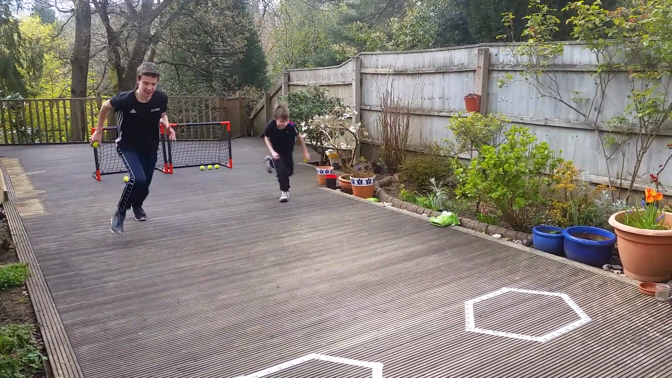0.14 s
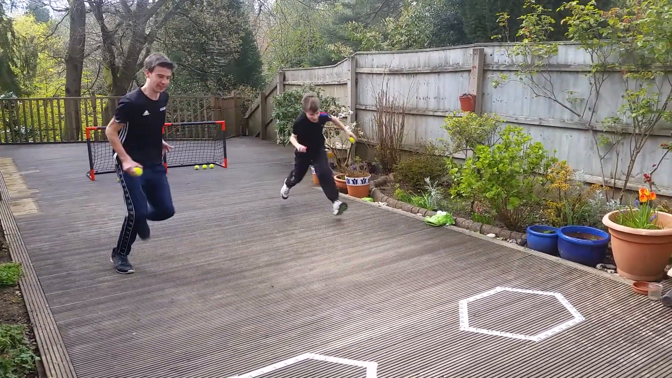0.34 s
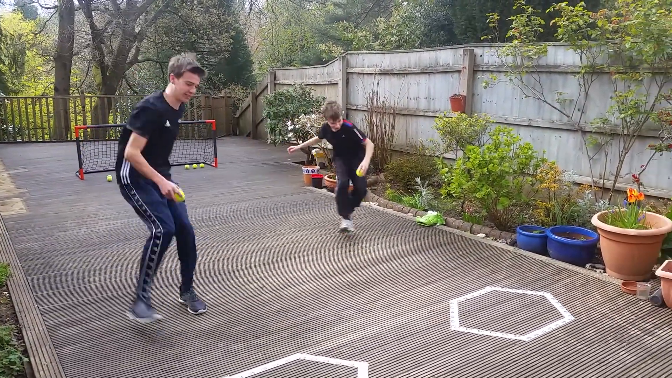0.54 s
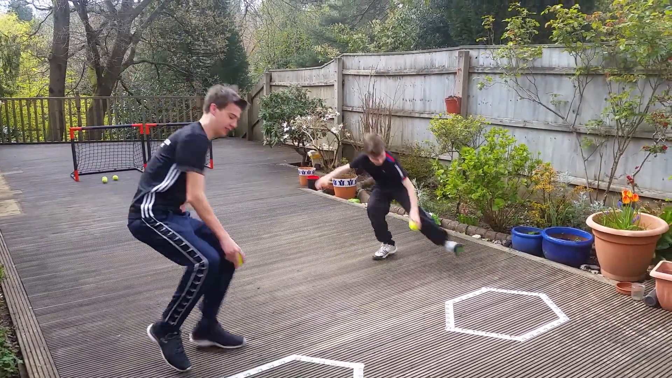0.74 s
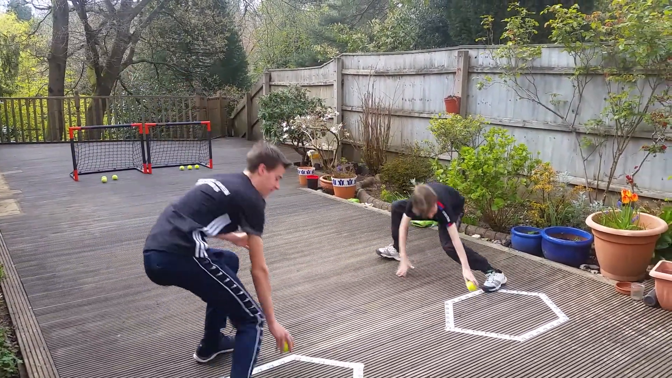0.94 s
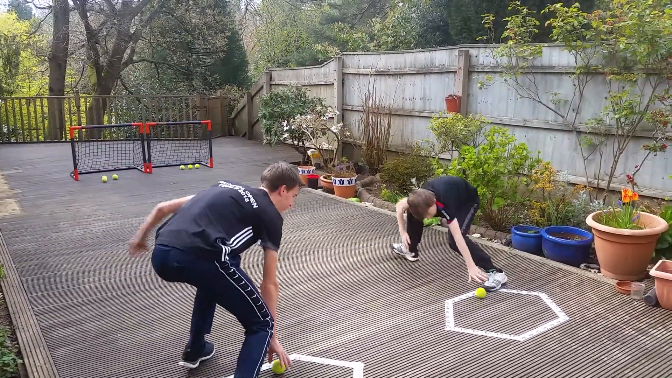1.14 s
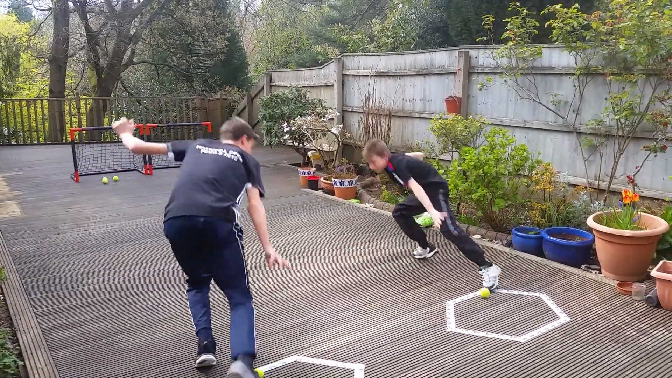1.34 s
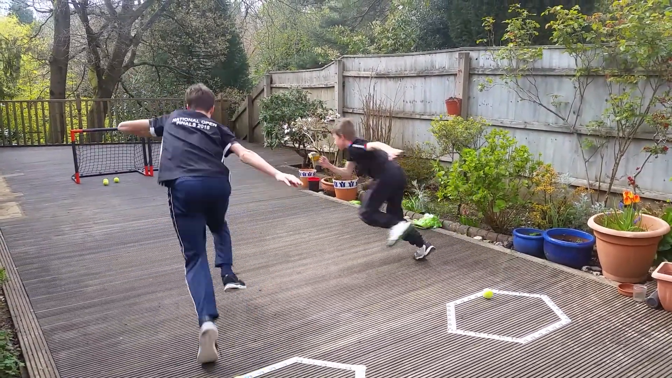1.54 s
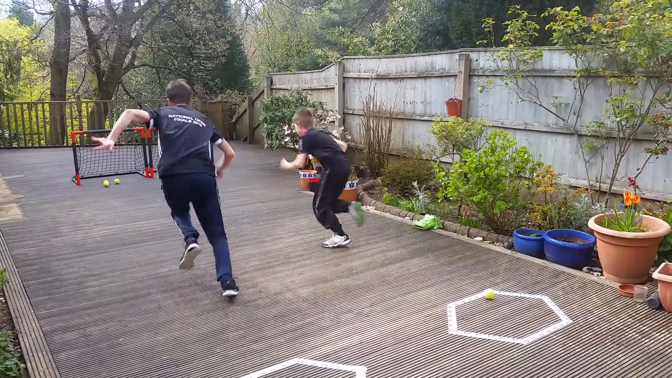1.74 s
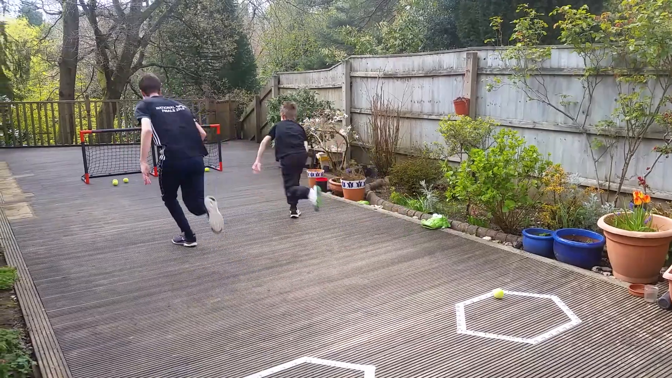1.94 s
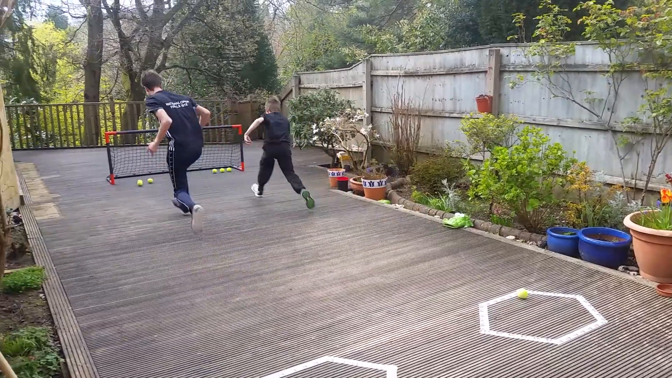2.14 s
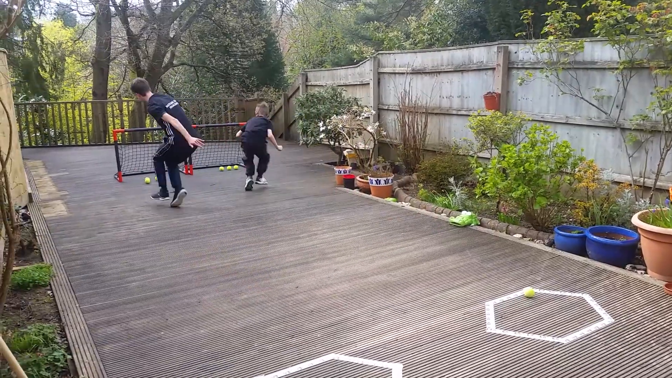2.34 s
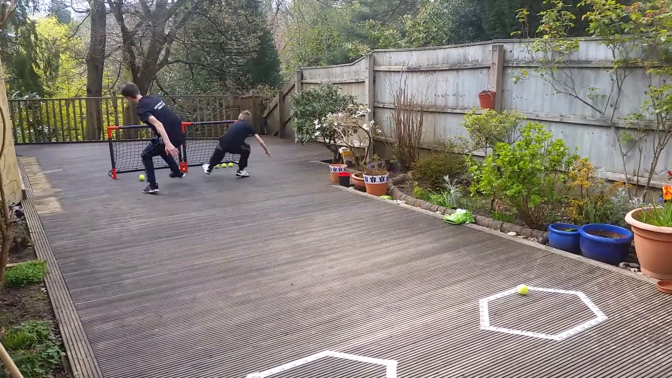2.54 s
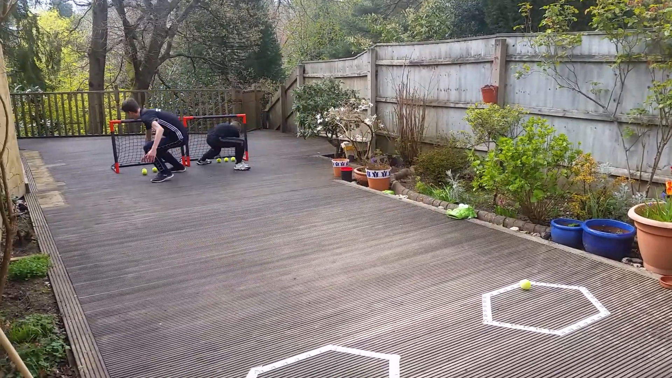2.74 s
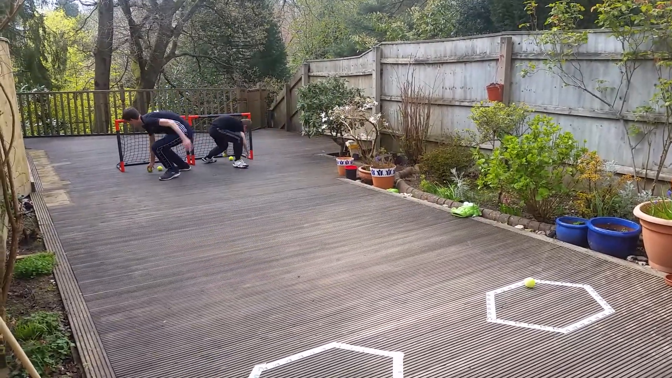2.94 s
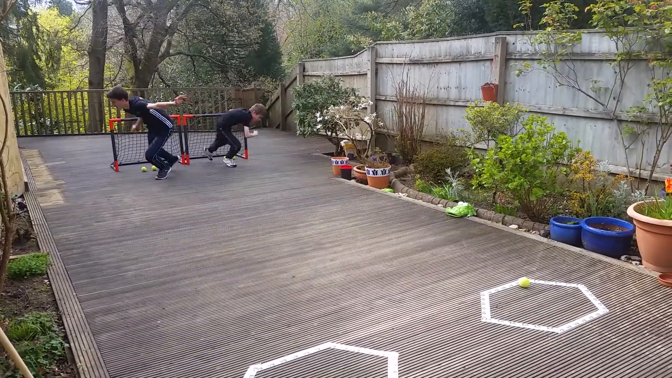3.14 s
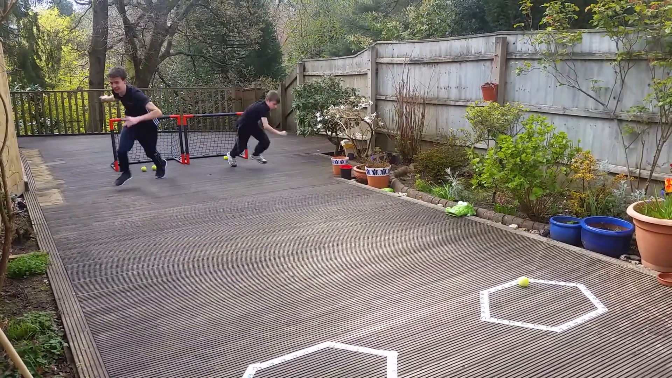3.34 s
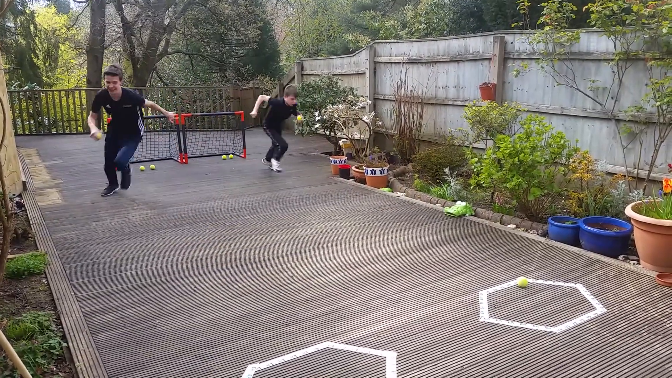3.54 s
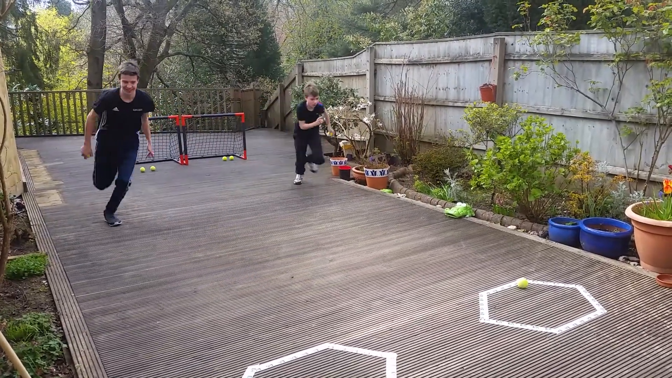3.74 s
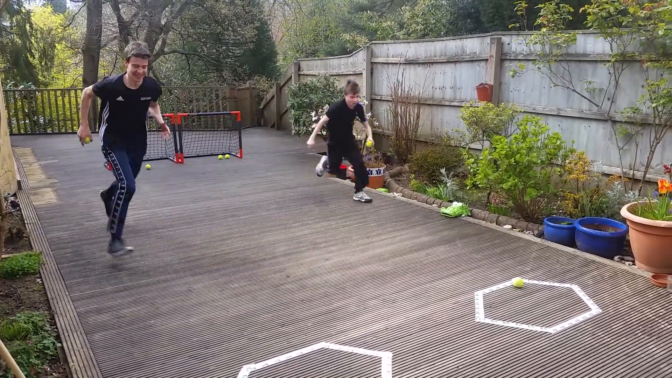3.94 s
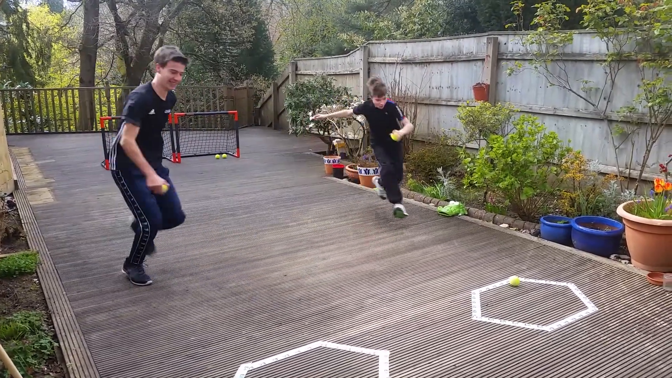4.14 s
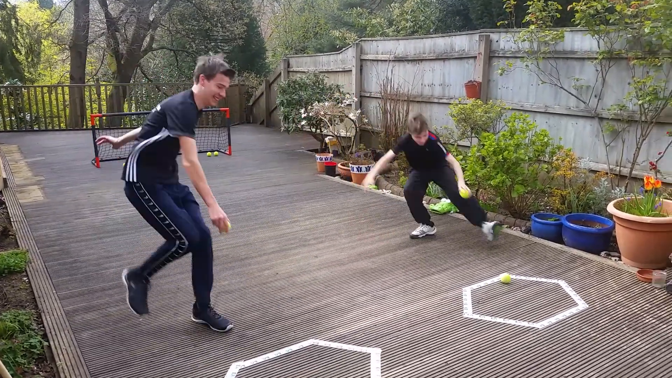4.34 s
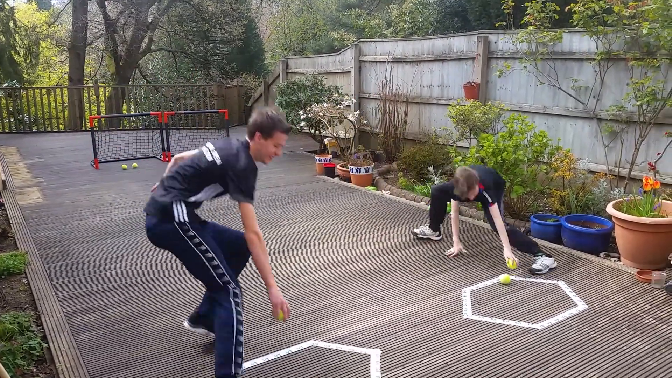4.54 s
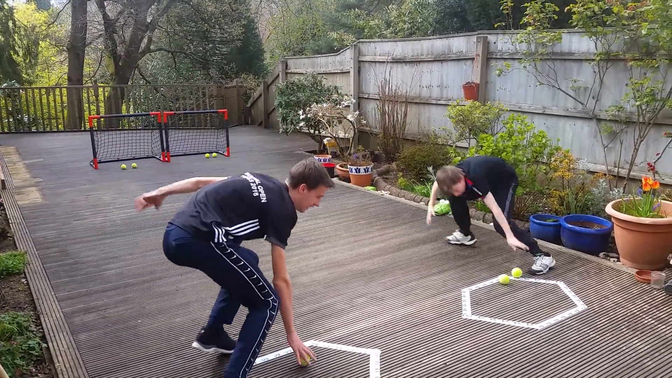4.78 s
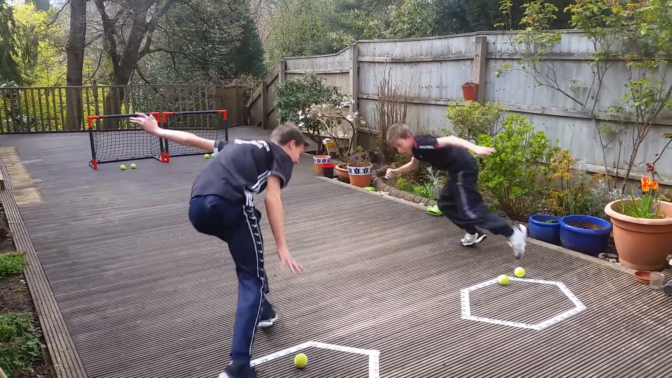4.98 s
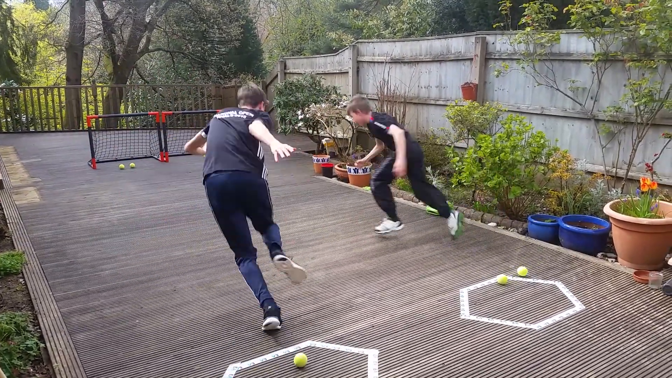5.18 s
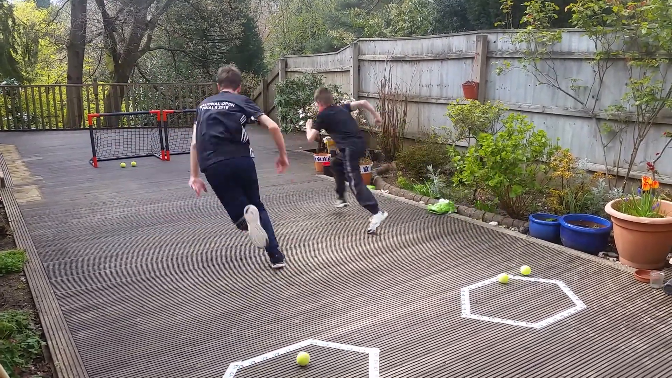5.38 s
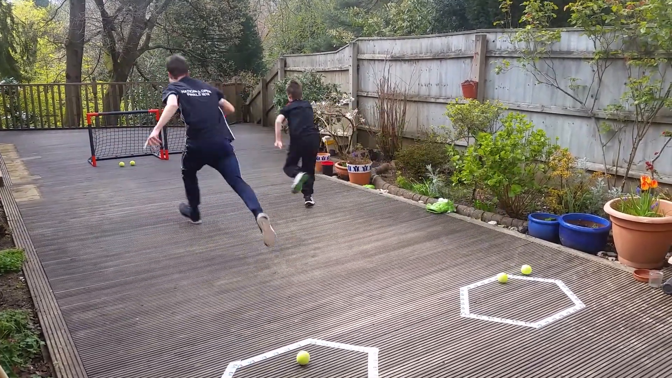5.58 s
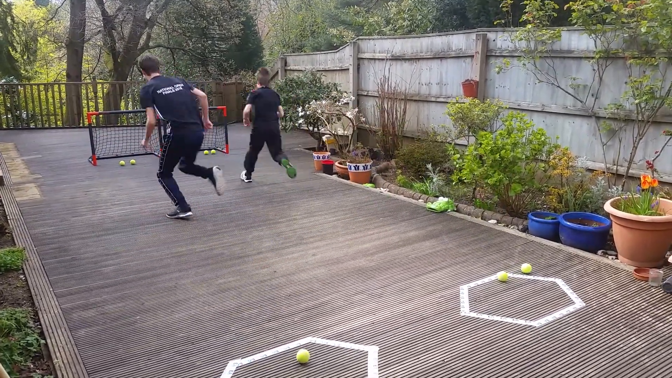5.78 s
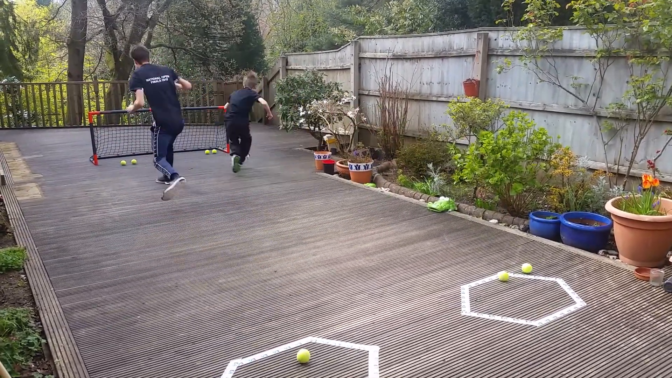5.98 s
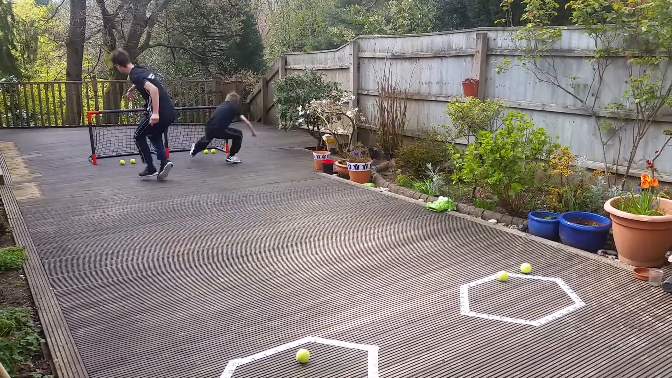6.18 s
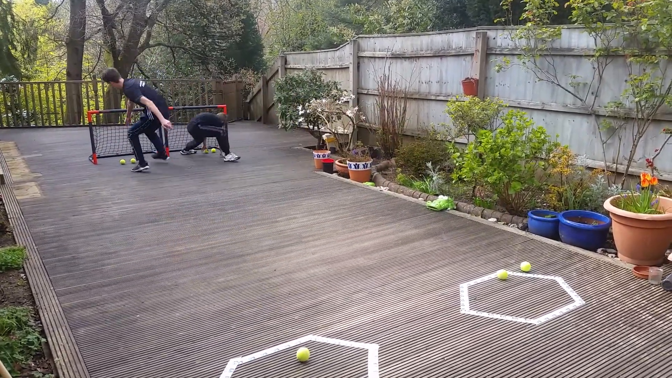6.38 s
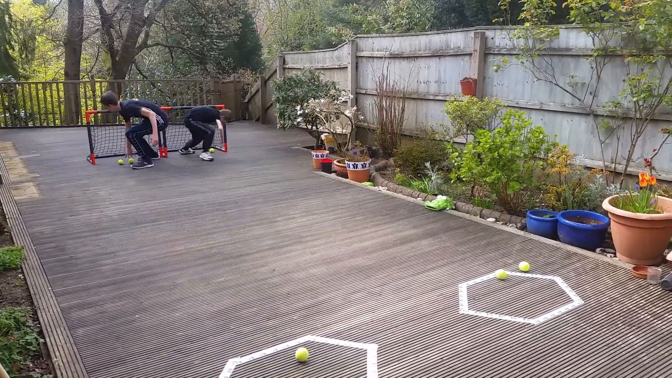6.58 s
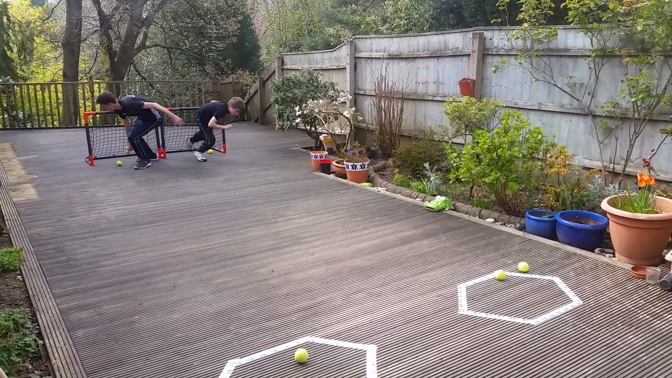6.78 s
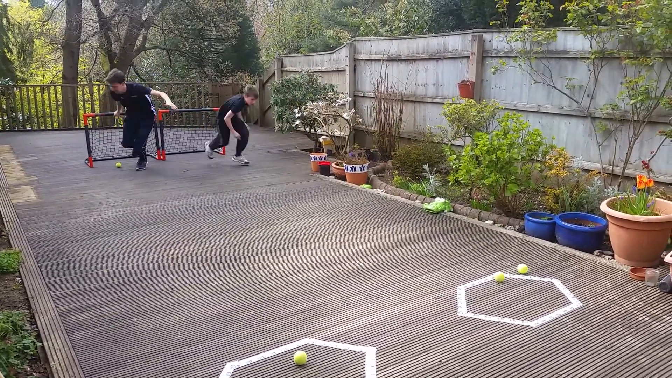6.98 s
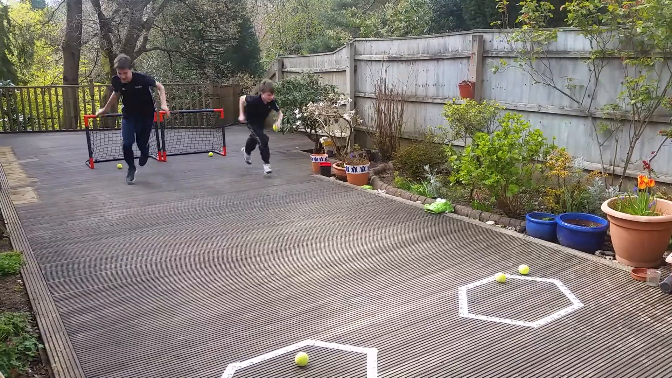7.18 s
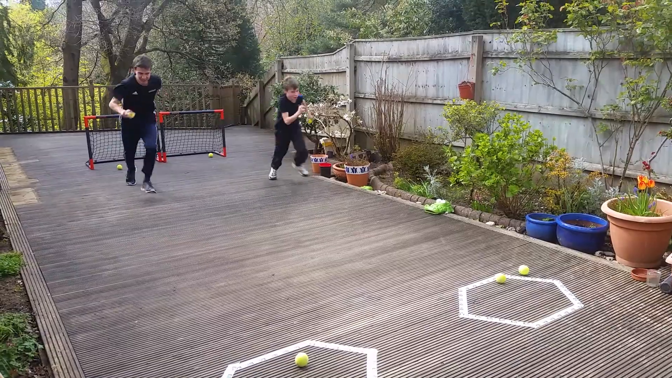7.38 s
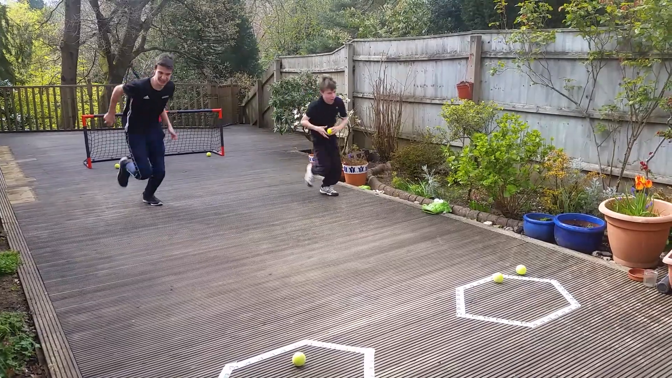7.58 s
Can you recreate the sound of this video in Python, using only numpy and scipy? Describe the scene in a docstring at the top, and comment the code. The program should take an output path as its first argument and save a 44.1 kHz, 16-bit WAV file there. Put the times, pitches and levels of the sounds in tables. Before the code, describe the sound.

Quick, hollow thuds of trainers on garden decking approach, pause at the turns and retreat, with rubber squeaks over a quiet outdoor hush.

```python
"""A fenced garden in stereo: a hush with distant traffic lies under the scene from the start, as band-shaped noise.
Close by, soles skid over a hollow timber deck (grain noise with a narrow squeak) as two runners sprint and turn.
Then come footfalls and a lighter contact: each slaps a board, booms it and shakes the joists (decaying sines).
Trouser legs soon swish between the steps (high, narrow-band grains), and fence, wall and shrubs echo it all.
From about two seconds a small bird whistles far off in the trees: short, sinking, wavering sines, mostly echo."""
import sys
import numpy as np
from scipy import signal
from scipy.fft import rfft, irfft, next_fast_len
from scipy.io import wavfile
from scipy.ndimage import uniform_filter1d

SR = 44100
rng = np.random.default_rng(int(sys.argv[2]) if len(sys.argv) > 2 else 0)


def to_wav(sig):
    """Store sig (one row per channel, or 1-D mono) as 16-bit WAV at the path in sys.argv[1].

    Samples outside -1..1 are clipped; the rate is SR.
    """
    pcm = np.clip(np.atleast_2d(sig), -1, 1) * 32767
    pcm = np.round(pcm).astype(np.int16)
    wavfile.write(sys.argv[1], SR, pcm.T)  # frames by channels


N = 335975
TIME = np.arange(N) / SR
AGE = np.arange(16384) / SR   # time since onset (s); each single contact or whistle is cut off where it ends

# level of the airy hush, which dips and recovers: [t/s, level/dB before HUSH_DB]
AIR_LEVEL = [(0.0, -48), (0.44, -54), (0.59, -45), (0.8, -48), (1.23, -67), (1.72, -65), (1.89, -52),
             (2.33, -55), (2.54, -43.5), (3.29, -54), (3.97, -55.5), (4.5, -51), (4.69, -65), (4.9, -64),
             (6.41, -47), (6.83, -53.5), (7.62, -54.5)]
# level of the low rumble, which dips and recovers: [t/s, level/dB before RUMBLE_DB]
LOW_RUMBLE_LEVEL = [(0.0, -47), (0.87, -47), (1.17, -62.5), (1.53, -62), (2.61, -42.5), (3.07, -54.5),
                    (4.48, -49), (4.94, -61.5), (6.2, -46), (7.62, -57.5)]
# spectrum of the hush: [f/Hz, relative level/dB]
HUSH_SPECTRUM = [(20, -19), (50, -6), (110, -9.5), (170, -4.5), (260, 1), (450, -12), (620, -16.5),
                 (870, -12.5), (1300, -21.5), (2300, -25.5), (2900, -38), (4300, -38.5), (7500, -65),
                 (10000, -61), (13000, -50.5), (16000, -53)]
HUSH_DB, RUMBLE_DB = 3.5, 7.5   # gains

# soles sliding over the grooves:
# [t/s, nominal length/s, level/dB, squeak f/Hz, squeak level over scrape/dB]
SOLE_SCUFFS = [(-.01, 0.032, -36, 2220, 2), (0.535, 0.021, -30, 2300, 7.5), (0.962, 0.07, -40.5, 2300, -14),
               (1.214, .04, -58, 3600, -18), (1.804, 0.16, -45.5, 2440, -11),
               (2.361, 0.073, -30, 2520, -19), (2.808, 0.074, -32.5, 2270, 2.5),
               (4.191, 0.069, -34, 1510, 14), (4.35, 0.053, -44.5, 2260, 8), (4.568, 0.036, -34, 1180, 0),
               (4.606, 0.063, -40.5, 2050, -5), (4.666, .11, -53.5, 1850, -8),
               (4.902, 0.21, -56.5, 1670, 0), (5.232, 0.082, -63.5, 2140, 19),
               (5.386, 0.45, -49, 2340, -29), (6.188, 0.041, -33, 2280, 7),
               (6.373, 0.033, -34.5, 2230, -11), (6.386, 0.067, -29, 3870, -7.5),
               (6.673, 0.023, -36.5, 4400, 3.5), (6.696, 0.031, -37, 4360, -5.5),
               (7.122, 0.038, -31, 2220, 32)]
# spectrum of rubber on the ribs: [f/Hz, relative level/dB]
SCRAPE_SPECTRUM = [(200, 2), (500, 6), (1100, 4), (1800, 0), (2500, 1), (3300, -18), (4600, -15.5),
                   (6500, -30), (8000, -33.5), (16000, -43)]
# course of one scuff: [t/nominal length, gain]
SCUFF_STROKE = [(0, 1.0), (.12, 0.95), (.55, 0.8), (1.5, 0.05)]

# decay of the garden's echo by 60 dB: [f/Hz, t/s]
GARDEN_DECAY = [(200, 0.65), (1000, 0.69), (2500, 0.7), (5000, 0.65), (12000, 0.59)]
# spectrum of the echo: [f/Hz, level/dB]
GARDEN_SPECTRUM = [(100, -11.5), (300, -17.5), (600, 1), (1000, -8.5), (2500, -4), (5000, 3), (12000, 1)]

# one row per footstep or other light contact with the deck, such as a ball set down;
# the nearer a joist it lands, the larger the joist share;
# twist is 0 for a straight stride and 1 for a foot that grinds round in a turn:
# [t/s, board level/dB before the boom's 1 dB gain, board f/Hz at the heel, joist level over board level/dB,
#  sole slap level/dB, twist 0-1, side -1 right to 1 left (held there beyond), heel to toe t/s,
#  toe level minus heel level/dB]
DECK_CONTACTS = [(0.107, -34.5, 224, -9.5, -47, 0.5, 0.56, .017, 0),
                 (0.216, -30.5, 191, -11.5, -41, 0.56, 0.58, .02, -4),
                 (0.376, -30, 238, 0, -45.5, 0.25, 0.53, .012, -6),
                 (0.394, -10, 213, -10, -24, 0.23, 0.54, .033, -6.5),
                 (0.512, -23, 185, -21.5, -32, 0.27, -0.06, .027, 2.5),
                 (0.611, -30, 240, -13, -41.5, 0.5, 0.46, .02, -16.5),
                 (0.644, -11, 211, -14.5, -28.5, 0.55, 0.59, .028, -13.5),
                 (0.752, -10, 190, -16.5, -24, 0.58, 0.35, .038, -17.5),
                 (0.876, -28, 232, -22, -37, 0.3, 0.49, .02, -31),
                 (0.942, -34, 215, -18, -40, 0.37, 0.79, .021, 8),
                 (1.009, -26, 170, -14.5, -53, 1, 0.47, .02, -16),
                 (1.121, -40, 201, -15, -57, .4, 0.25, .035, -4),
                 (1.394, -44, 200, -21, -65, .8, .5, .06, -3),
                 (1.686, -37.5, 344, -33, -57, 0, 0.47, .02, -18),
                 (1.745, -31, 189, -10, -39, 0.12, 0.24, .041, -0.5),
                 (2.036, -22, 167.6, -18.5, -32.5, 0.61, 0.5, .025, -4.5),
                 (2.3, -30.5, 234, -27.5, -43.5, 0.7, -1.37, .015, -3.5),
                 (2.326, -11, 256, -15.5, -26.5, 0.5, 0.43, .031, 3),
                 (2.578, -12, 226, -10, -23, 0.25, 0.59, .025, -0.5),
                 (2.789, -29.5, 195, -13.5, -37, 0.74, 0.12, .023, -3.5),
                 (3.534, -25.5, 264, -5.5, -28.5, 0.12, 0.73, .02, -9.5),
                 (3.757, -25.5, 239, -14, -33, 0, 0.48, .057, -1.5),
                 (4.029, -33, 203, -12.5, -44, 0.46, 0.12, .025, -0.5),
                 (4.131, -30, 202, -12, -50.5, 0.87, 0.55, .012, -15),
                 (4.154, -7.5, 190, -17, -22.5, 0.01, 0.76, .026, -11.5),
                 (4.375, -28.5, 233, -7.5, -33.5, 0.4, 0.12, .054, -11),
                 (4.455, -14.5, 185, -9, -27.5, 0.08, -0.79, .03, -27),
                 (4.541, -33, 172, -8, -40, .5, 0.37, 0.023, -6),
                 (4.57, -21.5, 247, -15.5, -34, 1, -0.32, .068, -9.5),
                 (4.813, -41, 193, -14.5, -66, 0, .3, .02, -3),
                 (4.882, -56, 198, -13, -52, 0.3, 1, .02, -11),
                 (5.126, -38.5, 260.4, -17.5, -54.5, 0.2, 0.45, .021, 2.5),
                 (5.345, -31.5, 179, -18, -41.5, 0.3, 0.23, .03, -7.5),
                 (5.437, -23.5, 217, -5.5, -38, 0, 0.23, .02, -24),
                 (5.592, -26, 165, -28, -38, 0.27, 0.7, .082, -12),
                 (5.72, -29, 197.6, -15, -44, 0.89, 0.76, .066, -4),
                 (5.891, -28.5, 256, -13.5, -41.5, 0.3, 0.56, .027, 4.5),
                 (6.11, -11.5, 226, -13.5, -26.5, 0.38, 0.69, .023, 0),
                 (6.2, -23.5, 182, -14.5, -33.5, .3, 0.82, .02, -4),
                 (6.394, -17, 266, -10, -28.5, 0.45, 0.46, .018, -1),
                 (6.455, -27.5, 164, -23, -35, 0.76, -0.63, .02, -14),
                 (6.704, -40.5, 206, -29, -45.5, 1, 0.87, .02, -4.5),
                 (7.123, -25, 292, -9.5, -29, 0.37, -0.86, .025, -9),
                 (7.327, -30.5, 300, -18.5, -41, 0.2, 0.45, .025, 3.5),
                 (7.578, -38, 238, -7, -49, 0.15, 0.43, .03, 2)]
# spectrum of a sole slapping timber, before the tilt: [f/Hz, relative level/dB]
SLAP_SPECTRUM = [(150, -29.5), (300, 2), (450, 3.5), (600, 4.5), (900, 7.5), (1600, 1), (2000, -3.5),
                 (2500, -1.5), (3100, -22.5), (4000, -52), (8000, -52)]
# spectrum of the grit under the sole: [f/Hz, relative level/dB]
GRIT_SPECTRUM = [(1500, -39), (3000, 4.5), (4300, -1), (5500, -8), (6700, -13.5), (7800, -31.5),
                 (11000, -23), (16000, -24)]
# modes of the frame below the boards, before a random detuning: [f/Hz, relative level/dB]
JOIST_MODES = [(66, -39.5), (98, -6), (108, -0.5), (124, -6.5)]
# the toe lands on a board already loaded, so it sounds lower; then the board springs back, weaker and lower again
TOE_PITCH_RATIO, TOE_SLAP_DB = 0.959, -1
TOE_SLAP_FOLLOWS = 0.93   # share of the toe-minus-heel level that the slap takes on
REBOUND_S, REBOUND_DB, REBOUND_SLAP_DB, REBOUND_PITCH_RATIO = .025, -8, -7, .84
GRIT_DB, TWIST_GRIT_DB = -32, 19   # grit against the slap in a straight stride; what a full twist adds
SLAP_TILT_DB, TWIST_TILT_DB = -1.5, 6.5   # slope of the slap per octave; what a full twist adds
KNOCK_LOW_HZ, KNOCK_HIGH_HZ = 700, 2040   # every blow draws its knock from this range
MICROPHONE_SPAN_S = 0.00043   # time for sound to pass from one microphone to the other

# trouser legs brushing past each other: [t/s, level/dB before the stroke]
TROUSER_SWISHES = [(0.444, -57.5), (0.586, -60), (0.67, -56), (4.185, -71), (4.47, -63), (5.379, -65),
                   (5.49, -72), (5.72, -61)]
# course of one swish: [t/s, gain]
SWISH_STROKE = [(0, 0.29), (.012, 0.49), (.035, 0.036), (.1, 0.03)]
SWISH_HZ = 8360

# bird in the trees: [t/s, length/s, first f/Hz, time constant of the fall/s, level/dB before direct and echo gains]
BIRD_WHISTLES = [(1.98, 0.039, 4880, 0.18, -69), (2.072, 0.1, 4320, 0.084, -62),
                 (2.52, 0.1, 4820, 0.31, -60.5), (2.632, 0.1, 4360, .12, -62.5),
                 (3.393, 0.11, 4980, .3, -77), (3.636, .12, 4600, 0.47, -72.5),
                 (5.794, 0.068, 4330, 0.12, -57), (6.244, 0.038, 5570, .24, -73),
                 (6.291, 0.12, 4290, .15, -53), (6.773, 0.045, 4150, 0.062, -49.5),
                 (7.166, 0.12, 5040, 0.1, -63.5), (7.273, 0.065, 4225, 0.095, -50),
                 (7.499, 0.09, 5460, 0.28, -72.5)]
REST_HZ = 3900   # every whistle sinks towards this pitch
FLUTTER_DB = 2.5   # rms depth of the bird's flutter

# difference between the two microphones: [f/Hz, left minus right level/dB]
MICROPHONE_DIFFERENCE = [(100, -1.5), (300, 1), (700, 2), (1200, 1), (2500, 5.5), (5000, 5), (8000, 14.5),
                         (14000, 4)]
CUTOFF_HZ = 15700


def from_db(db):
    """Decibels to gain."""
    return 10 ** (np.asarray(db) / 20)


def rms_one(x, first_s=None):
    """Scale to rms 1, over the whole sound or over its start."""
    part = x if first_s is None else x[..., :int(first_s * SR)]
    return x / np.sqrt(np.mean(part ** 2) + 1e-20)


def at_hz(points, hz):
    """Read a table on a log-frequency axis."""
    f, value = np.transpose(points)
    return np.interp(np.log(np.maximum(hz, 1)), np.log(f), value)


def fade(age, t60):
    """Exponential decay that starts at age 0 and falls 60 dB in t60 seconds."""
    return (age >= 0) * np.exp(-np.log(1000) * np.maximum(age, 0) / t60)


def coloured(x, spectrum):
    """Causal (minimum-phase) filter with the given spectrum."""
    size = 2 * next_fast_len(x.shape[-1] // 2 + 1024)
    level_db = at_hz(spectrum, np.fft.rfftfreq(size, 1 / SR))
    cepstrum = irfft(np.log(from_db(level_db)))
    # folding the cepstrum onto positive times makes the phase minimal
    cepstrum[1:size // 2] *= 2
    cepstrum[size // 2 + 1:] = 0
    response = np.exp(rfft(cepstrum))
    return irfft(rfft(x, size) * response)[..., :x.shape[-1]]


def resonance(x, hz, width_hz):
    """Two-pole band-pass, gain 1 on top."""
    r = np.exp(-np.pi * width_hz / SR)
    zeros = np.array([1, 0, -1]) * (1 - r * r) / 2
    poles = [1, -2 * r * np.cos(2 * np.pi * hz / SR), r * r]
    return signal.lfilter(zeros, poles, x)


def add(track, s, sound):
    """Mix a sound into the track at time s, cutting what lies outside it."""
    start = round(s * SR)
    sound = sound[..., max(-start, 0):max(N - start, 0)]
    start = max(start, 0)
    track[..., start:start + sound.shape[-1]] += sound


def grains(size, spread_db):
    """Stereo train of tiny contacts (32 samples each) of very uneven strength."""
    strength = from_db(spread_db * np.clip(rng.standard_normal(size // 32 + 1), -2, 2))
    noise = rng.standard_normal((2, size))
    return rms_one(noise * np.repeat(strength, 32)[:size])


def hush():
    """Distant air and traffic: the rumble is alike at both microphones, the air above it only partly."""
    noise = coloured(rng.standard_normal((3, N)), HUSH_SPECTRUM)
    shared = noise[2]
    low_pass = signal.butter(2, 110, fs=SR, output="sos")
    high_pass = signal.butter(2, 330, "high", fs=SR, output="sos")
    rumble = rms_one(signal.sosfilt(low_pass, shared))
    air = rms_one(signal.sosfilt(high_pass, noise[:2] + 0.78 * shared))
    air_db = np.interp(TIME, *np.transpose(AIR_LEVEL))
    rumble_db = np.interp(TIME, *np.transpose(LOW_RUMBLE_LEVEL))
    return from_db(HUSH_DB + air_db) * air + from_db(RUMBLE_DB + rumble_db) * rumble


def scuffs():
    """Rubber skids over the ribs of the boards; stick and slip adds a narrow squeak."""
    out = np.zeros((2, N))
    stroke_at, stroke_gain = np.transpose(SCUFF_STROKE)
    for s, length, level_db, squeak_hz, squeak_db in SOLE_SCUFFS:
        rub = grains(len(AGE), spread_db=5)
        stroke = np.interp(AGE / length, stroke_at, stroke_gain, right=0)
        scrape = rms_one(coloured(rub, SCRAPE_SPECTRUM))
        squeak = rms_one(resonance(resonance(rub, squeak_hz, width_hz=250), squeak_hz, width_hz=250))
        skid = rms_one(scrape + from_db(squeak_db) * squeak)
        add(out, s, from_db(level_db) * stroke * skid)
    return out


def garden(x, build_s):
    """Fence, house wall and shrubs scatter the sound into a tail that dies band by band."""
    age = np.arange(SR) / SR
    white, tail = rng.standard_normal((2, SR)), 0
    edges = np.geomspace(60, 17000, 9)
    for low, high in zip(edges, edges[1:]):
        band = signal.sosfilt(signal.butter(2, [low, high], "band", fs=SR, output="sos"), white)
        tail = tail + band * fade(age, at_hz(GARDEN_DECAY, np.sqrt(low * high)))
    tail = rms_one(tail * (1 - np.exp(-age / build_s))) / np.sqrt(SR)
    return signal.fftconvolve(x, coloured(tail, GARDEN_SPECTRUM), axes=-1)[:, :N]


def board(hz, t60, neighbour_t60, neighbour_db, spread_s, overtone_db, count=12):
    """The struck board booms; the bending wave reaches its neighbours a little later and they beat with it."""
    own = rms_one(-np.sin(2 * np.pi * hz * AGE) * fade(AGE, t60), 0.021)
    pitches = np.geomspace(135, 490, count) * np.exp(0.0502 * rng.standard_normal(count))
    # the higher bending modes are weaker
    weights = from_db(at_hz([(290, 0.0022), (360, overtone_db)], pitches))
    signs = rng.choice([-1, 1], count)
    age = AGE - rng.uniform(0.001, spread_s, (count, 1))
    modes = np.sin(2 * np.pi * pitches[:, None] * age) * fade(age, neighbour_t60)
    neighbours = rms_one((weights * signs) @ modes, 0.04)
    boom = own + from_db(neighbour_db) * neighbours
    # air slips through the gaps between boards, so the deepest part hardly radiates; the soft sole rounds the top
    radiated = signal.butter(2, [90, 750], "band", fs=SR, output="sos")
    return rms_one(signal.sosfilt(radiated, boom), 0.015)


def joists(t60, rise_s):
    """The frame and the hollow under it answer late and ring low."""
    hz, level_db = np.transpose(JOIST_MODES)
    hz = hz * np.exp(0.044 * rng.standard_normal(len(hz)))
    weights = from_db(level_db) * rng.choice([-1, 1], len(hz))
    ring = weights @ np.sin(2 * np.pi * hz[:, None] * AGE)
    return rms_one(ring * fade(AGE, t60) * (1 - np.exp(-AGE / rise_s)), 0.077)


def contact(spectrum, crack_t60, settle_db, settle_t60, rough_db):
    """A sole hits with a short crack, then rolls flat in a rattle of small contacts."""
    burst = rng.standard_normal(len(AGE)) * fade(AGE, crack_t60)
    crack = rms_one(coloured(burst, spectrum), 0.006)
    rattle = grains(len(AGE), rough_db) * fade(AGE, settle_t60)
    settle = rms_one(coloured(rattle, spectrum), 0.12)
    return crack + from_db(settle_db) * settle


def from_the_side(sound, side):
    """The sound reaches the nearer microphone first."""
    delays = MICROPHONE_SPAN_S * np.clip([-side, side], 0, 1)   # left, right
    return np.array([np.interp(AGE - delay, AGE, x, left=0) for delay, x in zip(delays, sound)])


def blow(board_db, board_hz, slap_db, joist_share_db, twist, side):
    """One blow drives board, joists and sole; a twisting foot gives a brighter slap and grinds more grit."""
    boom = from_db(board_db + 1) * board(
        board_hz, t60=0.079, neighbour_t60=0.14, neighbour_db=-5, spread_s=.03, overtone_db=-11.5)
    shake = from_db(board_db + joist_share_db) * joists(t60=0.52, rise_s=0.0062)
    tilt_db = SLAP_TILT_DB + TWIST_TILT_DB * twist
    # the tilt acts from 600 to 2500 Hz and stays level beyond
    colour = [(hz, db + tilt_db * np.log2(np.clip(hz, 600, 2500) / 1200)) for hz, db in SLAP_SPECTRUM]
    slap = contact(colour, crack_t60=.017, settle_db=-11, settle_t60=.17, rough_db=6)
    knock_hz = KNOCK_LOW_HZ * (KNOCK_HIGH_HZ / KNOCK_LOW_HZ) ** rng.random()
    knock = rms_one(resonance(slap, knock_hz, width_hz=160), 0.012)
    grit = contact(GRIT_SPECTRUM, crack_t60=.02, settle_db=-7, settle_t60=.16, rough_db=6)
    grit_db = GRIT_DB + TWIST_GRIT_DB * twist
    sole = from_db(slap_db) * (slap + from_db(-6.5) * knock + from_db(grit_db) * grit)
    return shake + from_the_side(boom + sole, side)


def deck_contacts():
    """A step is three blows: heel, toe, and the board springing back; other contacts use the same three."""
    out = np.zeros((2, N))
    for s, board_db, hz, joist_share_db, slap_db, twist, side, roll_s, toe_db in DECK_CONTACTS:
        footing = joist_share_db, twist, side
        toe_board_db = board_db + toe_db
        toe_slap_db = slap_db + TOE_SLAP_DB + TOE_SLAP_FOLLOWS * toe_db
        heel = blow(board_db, hz, slap_db, *footing)
        toe = blow(toe_board_db, hz * TOE_PITCH_RATIO, toe_slap_db, *footing)
        rebound = blow(toe_board_db + REBOUND_DB, hz * REBOUND_PITCH_RATIO,
                       toe_slap_db + REBOUND_SLAP_DB, *footing)
        add(out, s, heel)
        add(out, s + roll_s, toe)
        add(out, s + roll_s + REBOUND_S, rebound)
    return out


def swishes():
    """The weave of the cloth zips briefly at a high pitch."""
    out = np.zeros((2, N))
    stroke = np.interp(AGE, *np.transpose(SWISH_STROKE), right=0)
    for s, level_db in TROUSER_SWISHES:
        rub = grains(len(AGE), spread_db=4)
        threads = resonance(resonance(rub, SWISH_HZ, width_hz=1500), SWISH_HZ, width_hz=1500)
        add(out, s, from_db(level_db) * stroke * rms_one(threads))
    return out


def bird():
    """Thin whistles sink exponentially in pitch, with a slight waver of pitch and flutter of level."""
    out = np.zeros((2, N))
    for s, length, first_hz, sag_s, level_db in BIRD_WHISTLES:
        along = np.clip(AGE / length, 0, 1)
        waver, flutter = rms_one(uniform_filter1d(rng.standard_normal((2, len(AGE))), size=200))
        sinking_hz = REST_HZ + (first_hz - REST_HZ) * np.exp(-AGE / sag_s)
        hz = sinking_hz * (1 + 0.006 * waver)
        swell = np.sqrt(np.abs(np.sin(np.pi * along))) * from_db(level_db + FLUTTER_DB * flutter)
        add(out, s, swell * np.sin(2 * np.pi * np.cumsum(hz) / SR))
    return out


def scene():
    """The deck near the microphones, the bird far off and mostly echo, the hush around them."""
    deck = deck_contacts() + scuffs() + swishes()
    song = bird()
    echoes = garden(from_db(-7) * deck + from_db(5) * song, build_s=0.0043)
    return deck + from_db(-5) * song + echoes + hush()


def record(dry):
    """The left microphone is the brighter one; peaks are clipped and the top is cut."""
    left, right = (
        coloured(x, [(hz, sign * db / 2) for hz, db in MICROPHONE_DIFFERENCE])
        for x, sign in zip(dry, (1, -1)))
    clipped = np.clip(np.array([left, right]), -1, 1)
    low_pass = signal.ellip(10, .1, 80, CUTOFF_HZ, fs=SR, output="sos")
    return signal.sosfilt(low_pass, clipped)


dry = scene()
out = record(dry)
to_wav(out)
```